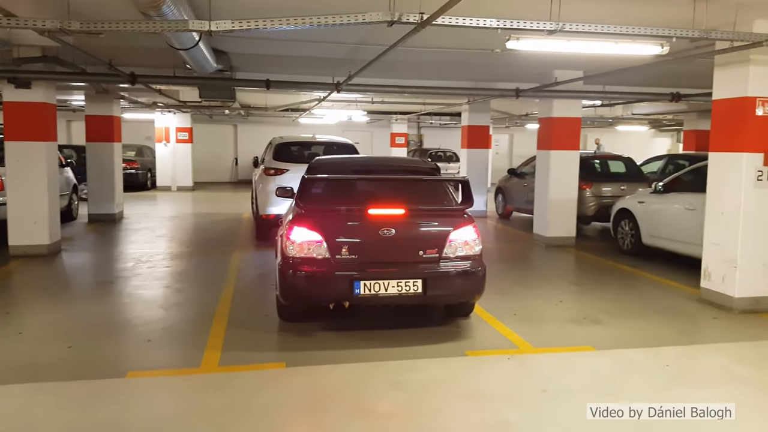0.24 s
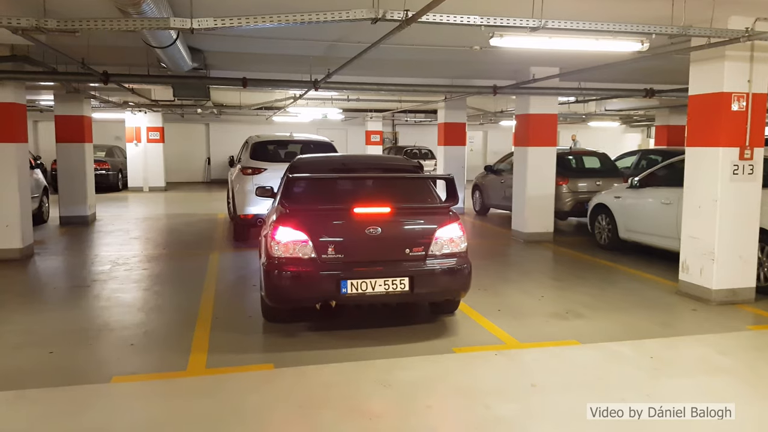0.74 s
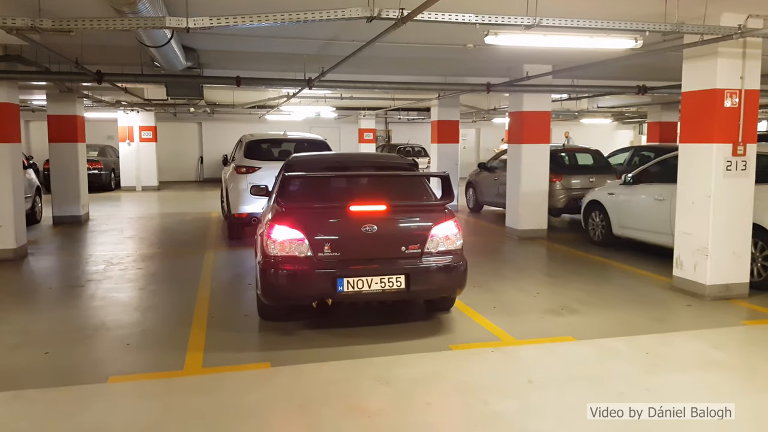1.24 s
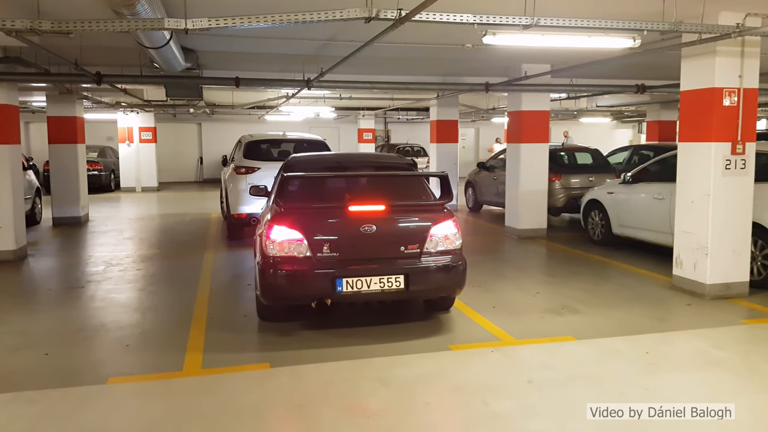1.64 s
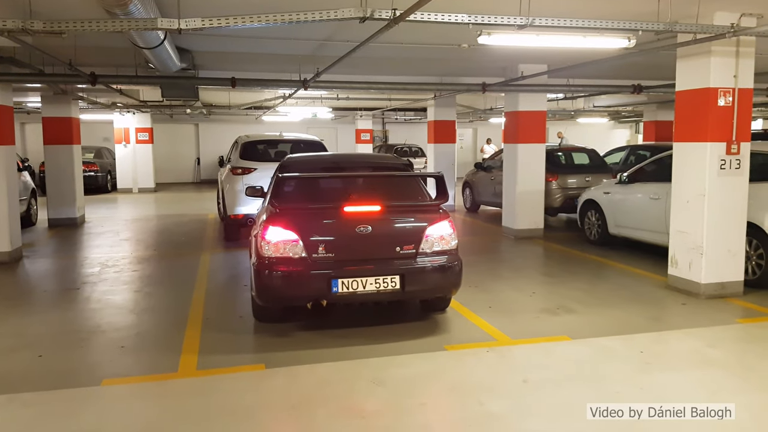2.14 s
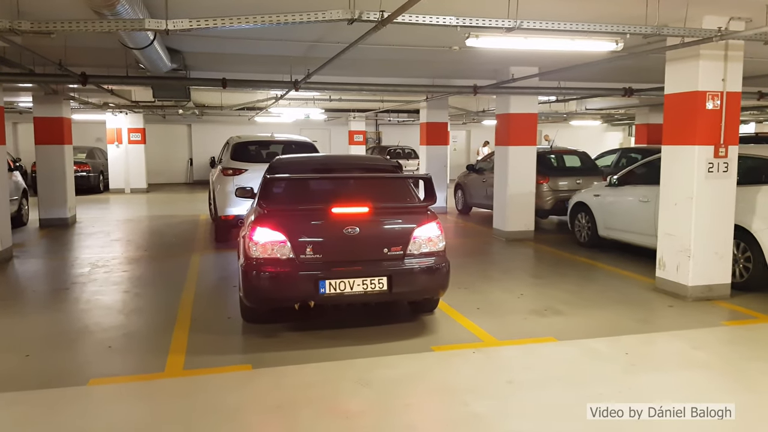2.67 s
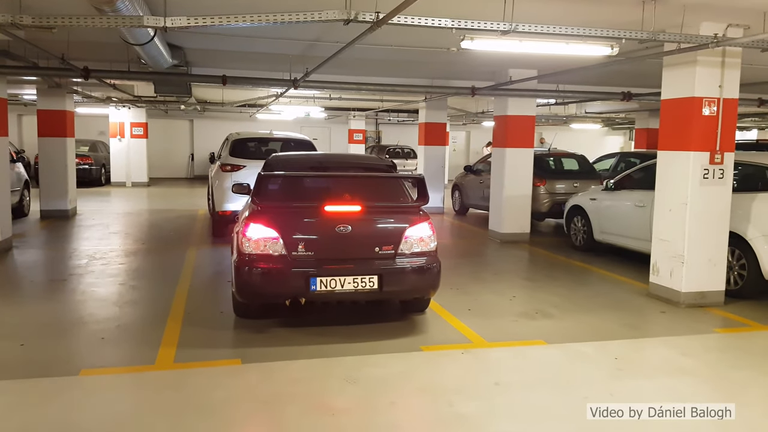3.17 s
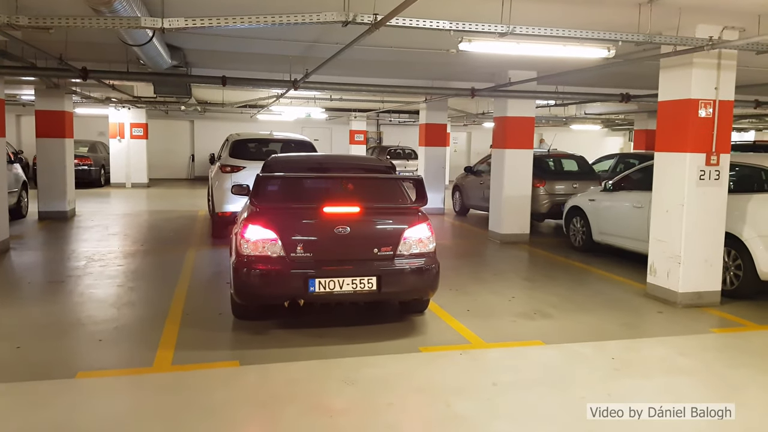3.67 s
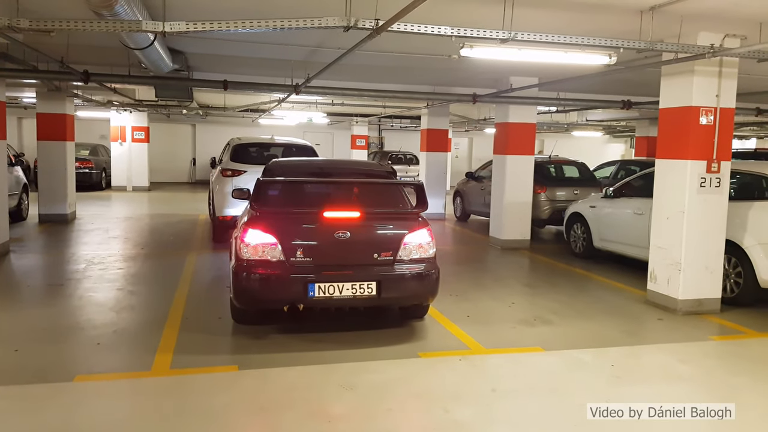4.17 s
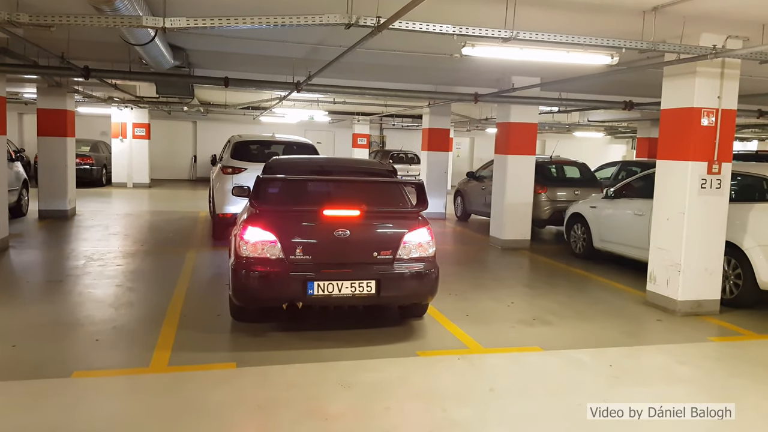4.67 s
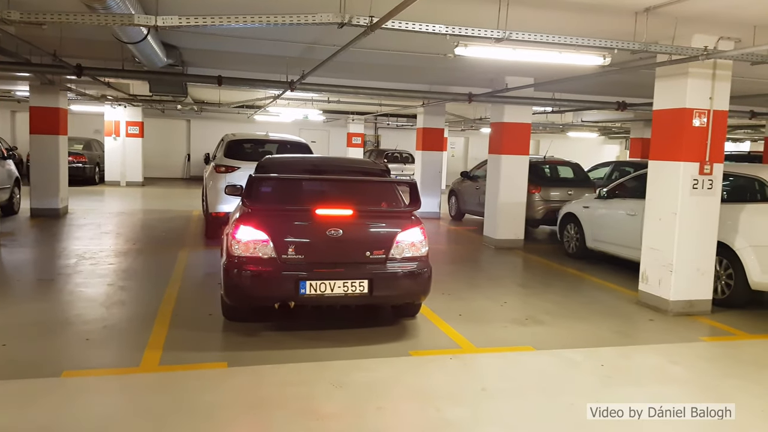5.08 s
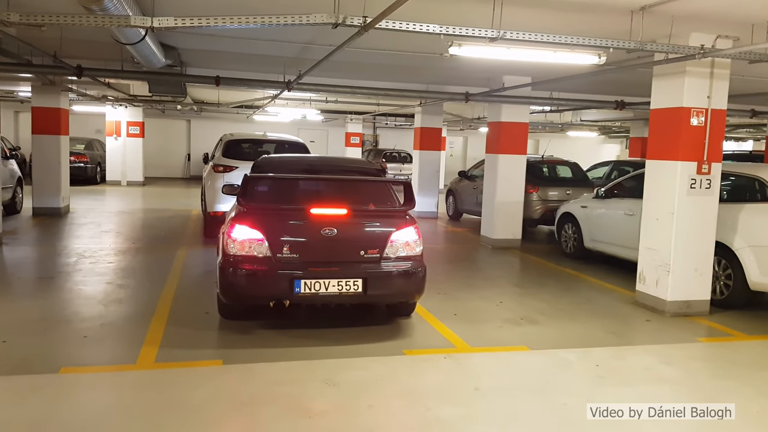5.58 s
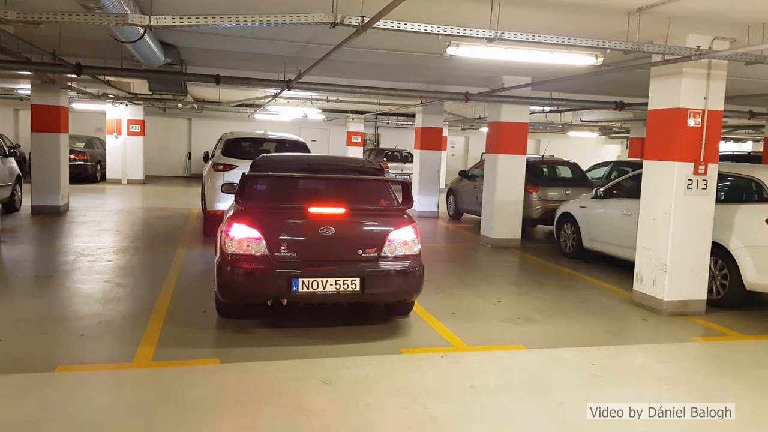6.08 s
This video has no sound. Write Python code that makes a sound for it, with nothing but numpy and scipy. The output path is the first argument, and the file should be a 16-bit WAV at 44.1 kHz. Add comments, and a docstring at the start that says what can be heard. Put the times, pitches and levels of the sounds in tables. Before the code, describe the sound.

A car idles with a deep, uneven, burbling exhaust in an echoing underground car park, its slightly fast idle sinking and settling under a steady mechanical whirr.

```python
"""Idling flat-four in an underground car park

A car is heard from behind; its fast idle sinks and settles. The cylinders fire in pairs, bank after bank,
into unequal headers: pulse trains with echoes, filtered by silencer and hall, make the exhaust burble.
Shaped noise and fading tones give the whirr and whine of the engine bay, diffused by the concrete.
Filtered impulses make a few tiny close ticks; decaying diffuse noise makes the clunks far off in the hall."""
import sys
import numpy as np
from scipy import signal
from scipy.fft import rfft, irfft, next_fast_len
from scipy.io import wavfile
from scipy.ndimage import uniform_filter1d, map_coordinates

SR = 44100
rng = np.random.default_rng(int(sys.argv[2]) if len(sys.argv) > 2 else 0)


def transcribe(u):
    """Save the signal u as a 16-bit wav file named by the first command-line argument.

    u: samples, shape (n,) or (channels, n), limited to [-1, 1]; the rate is SR.
    q: integer samples, one column per channel.
    """
    v = np.clip(np.atleast_2d(u).T, -1, 1)
    q = np.round(v * 32767).astype(np.int16)
    wavfile.write(sys.argv[1], SR, q)


N = 278435
LEAD = SR // 3  # samples of running engine before the scene opens

# Engine speed, a fast idle that sinks and then hunts gently: t/s, firing rate f/Hz
IDLE_SPEED = [(0.0, 33.77), (0.2, 32.408), (0.4, 31.732), (0.6, 31.088), (0.8, 30.769), (1.0, 29.699),
              (1.2, 29.237), (1.6, 28.075), (2.0, 28.513), (2.5, 28.959), (3.0, 28.679), (3.5, 28.26),
              (4.0, 27.754), (4.4, 27.284), (4.8, 26.604), (5.2, 26.678), (5.8, 27.255), (6.31, 27.276)]
# Cylinders in firing order: strength level/dB, timing offset/s, header echo delay/s, echo share/1
CYLINDERS = [(2.9258, -0.0046, 0.0171, -0.1195), (2.1473, -0.0039, 0.0147, -0.1358),
             (3.2288, -0.0054, 0.0051, 0.6793), (1.4045, -0.0055, 0.005, 0.6311)]
# Relative response of silencer and tailpipe, before the treble roll-off: f/Hz, level/dB
PIPE_RESPONSE = [(18.0, -75.6), (28.0, -35.1), (39.0, -16.1), (55.0, 1.4), (67.0, -4.8), (82.0, 14.6),
                 (104.0, -17.9), (120.0, -3.9), (137.0, 2.0), (160.0, -23.7), (172.0, -21.0),
                 (185.0, -39.1), (205.0, -24.5), (222.0, -21.2), (250.0, -21.5), (280.0, -16.6),
                 (330.0, -52.6), (900.0, -84.4)]
# Standing waves of the hall: f/Hz, width/Hz, share/1 (negative where it opposes the direct sound)
ROOM_MODES = [(64.3, 4.7, -1.45), (66.3, 2.3, 2.44), (78.4, 6.1, -1.18), (91.0, 4.9, -1.72),
              (101.8, 3.0, 7.38), (108.2, 1.9, -1.81), (117.9, 2.9, -1.86), (130.0, 4.5, -0.85),
              (136.8, 3.0, -0.86), (143.3, 1.8, -0.46), (148.0, 4.6, -1.4), (157.8, 1.8, 1.01),
              (164.3, 4.1, -2.06), (169.5, 1.8, -3.2), (201.4, 3.2, 1.69), (221.1, 1.8, 1.23),
              (229.3, 4.4, -1.78), (254.7, 3.8, -1.4), (277.2, 10.8, -1.58), (285.4, 1.8, 1.59)]
# Echoes from the far walls: delay/s, share/1
WALL_ECHOES = [(0.076, 0.3605), (0.0888, 0.0681), (0.1017, 0.1869), (0.1067, 0.126), (0.1532, 0.1595),
               (0.2272, 0.0484), (0.2292, 0.0812), (0.2711, 0.078), (0.2888, 0.0713), (0.3054, 0.0269)]
# Mean level of the exhaust's bass over a cycle: t/s, level/dB
BASS_LEVEL = [(0.0, -27), (0.4, -26), (0.9, -20.0), (1.2, -21.5), (2.4, -21.0), (3.2, -19), (4.05, -19.5),
              (4.7, -21.5), (5.2, -20), (5.9, -18.5), (6.31, -18.5)]
# Lope of the idle: t/s, swing of the bass over a cycle/dB, place of its crest/firings
LOPE = [(0.4, 0.5, 3.8), (1.0, 0.1, 3.7), (2.6, -0.1, 2.4), (4.1, 0.2, 2.1), (6.0, 1, 1.8)]
# Relative spectrum of gas leaving the tailpipe: f/Hz, level per Hz/dB
GAS_SPECTRUM = [(12, -29), (35, -11), (60, 11.5), (100, -7), (140, 11.5), (185, -10), (230, -6.5),
                (285, -1), (330, -17.5), (450, -16), (900, -40)]
# Relative spectrum of the exhaust pulses sent into the reverberation: f/Hz, level per Hz/dB
WASH_SPECTRUM = [(18, -28), (29, 0), (41, 13), (52, 0), (72, 1), (100, -12), (140, 0), (162, 0.5),
                 (187, -11), (222, -2.5), (250, -3), (285, -5), (310, -9.5), (380, -21.5), (450, -30),
                 (900, -58)]
# Reverberation time of the hall: f/Hz, time for a 60 dB decay/s
REVERB_TIME = [(60, 1.15), (300, 3.15), (2000, 1), (10000, .6)]
# Stereo spread of diffuse sound: f/Hz, side minus mid level/dB
DIFFUSE_WIDTH = [(60, -23), (125, -15), (250, -16), (500, -14.5), (1000, -3.5), (2000, 0)]
# Reference loudness of the running engine, to which layers add their offsets: t/s, level/dB
LOUDNESS = [(0.0, -45.5), (0.35, -47), (1.1, -41.5), (2.17, -42), (2.82, -40), (6.31, -41)]
WHIRR_DB, HISS_DB, PUFF_DB, WASH_DB, SPIT_DB = 0.6, -10.5, 1.5, 5.5, -3  # layer offsets from LOUDNESS
# Relative spectrum of the engine bay's whirr: f/Hz, level/dB
WHIRR_SPECTRUM = [(180, -72), (300, -0.5), (385, -2), (430, -6), (510, -0.5), (572, -2.5), (735, -2),
                  (775, -7.5), (975, -5.5), (1060, -7), (1300, -10), (1850, -10.5), (1980, -14.5),
                  (2350, -14.5), (2760, -18.5), (3280, -18), (4500, -38.5), (5850, -47), (9900, -120)]
# Relative spectrum of the engine bay's hiss: f/Hz, level/dB
HISS_SPECTRUM = [(2060, -40), (3500, 0), (4760, -6), (5400, -3.5), (6320, -7), (7670, -3), (8330, -8.5),
                 (15000, -16.5), (15700, -28)]
# Whine of pumps and pulleys, levels at mean loudness: f/Hz, level/dB, width/Hz
WHINES = [(380, -59, 5), (537.5, -56.5, 3.96), (729.6, -58.5, 7.2), (953, -56.5, 4.08), (1181, -60.5, 10),
          (1480, -65.5, 26), (2250, -62.5, 70), (2950, -65, 36), (5270, -73, 82), (7790, -68, 300)]
STEADY_HZ = 6.8  # tones narrower than this mostly hold their level; wider ones flicker
# Relative spectrum of the third cylinder's spit: f/Hz, level per Hz/dB
SPIT_SPECTRUM = [(150, -45), (300, 5), (600, -4), (1000, -10), (3000, -31), (8000, -60)]
SPIT_AT, SPIT_LENGTH = 1.985, 0.047  # place in the cycle and half length, in firings
# Pitches or hiss bands that swell out of the whirr: t/s, f/Hz, width/Hz, half length/s, level/dB
SWELLS = [(0.15, 291.5, 63, 0.18, -54), (0.61, 280, 1.2, 0.17, -41.5), (3.02, 8600, 1600, 0.11, -61),
          (3.557, 734, 8, 0.23, -48.5), (4.308, 1850, 59, 0.078, -51.5), (4.6, 537, 8, 0.67, -52.5),
          (4.803, 4390, 1400, 0.32, -56.5), (4.813, 684, 14, 0.11, -44), (2.5, 1500, 700, 0.81, -53.5),
          (5.897, 222.4, 3.3, 0.59, -47.5), (6.101, 380, 6, 0.57, -51)]
# Sharp little ticks, impulses before gain and colour: t/s, level/dB
TICKS = [(2.2229, -39), (2.4479, -28), (2.5037, -39)]
# Response that colours the ticks: f/Hz, level/dB
TICK_COLOUR = [(2000, -24), (6000, -8), (10000, -6), (13000, 3), (16000, -9)]
# Knocks far off in the hall: t/s, level before the envelope/dB, 60 dB decay/s, attack/s, tilt/dB per octave
CLUNKS = [(3.629, -38, 0.089, .004, 3), (5.698, -33.5, 0.9, 0.015, 0), (5.706, -41, 1, .008, 2.5),
          (5.815, -44, 0.89, 0.022, 1)]
# Relative spectrum of the knocks before each one's tilt: f/Hz, level/dB
CLUNK_COLOUR = [(150, -8), (350, 6), (470, 7), (640, 3), (760, -6), (1400, -8), (2000, -12), (2900, -9),
                (5000, -18), (7500, -27.5), (15000, -37)]
# Stereo balance: f/Hz, left minus right level/dB
BALANCE = [(60, 1.0), (110, 1), (200, 0), (380, 1), (700, 0.5), (1290, -1), (2380, 1.5), (4400, 2.5),
           (8120, 1.5), (15000, 2.5)]
TOP_HZ = 15800  # upper band limit


def amp(db):
    """Level definition: decibels become an amplitude ratio."""
    return 10 ** (np.asarray(db) / 20)


def unit(x):
    """Power normalisation: x is scaled to rms 1."""
    return x / np.sqrt(np.mean(x ** 2) + 1e-20)


def along(points, hz):
    """Logarithmic frequency scale: a response is interpolated between its (f, value) points."""
    f, value = np.transpose(points)
    return np.interp(np.log(hz + 1), np.log(f + 1), value)


def curves(rows):
    """Linear interpolation in time: each column after t/s gives one value per sample."""
    s, *columns = np.transpose(rows)
    return [np.interp(np.arange(N) / SR, s, column) for column in columns]


def wobble(rate):
    """Band-limited fluctuation: a spline passes through random knots, rate of them a second."""
    knots = rng.standard_normal(int(N * rate / SR) + 4)
    return map_coordinates(knots, [np.arange(N) * rate / SR])


def filtered(x, response):
    """Linear filtering: the spectrum of x is multiplied by a response of frequency."""
    n = x.shape[-1]
    padded = 2 * next_fast_len((n + SR) // 2)
    return irfft(rfft(x, padded) * response(np.fft.rfftfreq(padded, 1 / SR)), padded)[..., :n]


def causal(db):
    """Minimum phase: folding the cepstrum gives the causal response that has these gains."""
    cepstrum = irfft(np.log(amp(db)))
    half = len(cepstrum) // 2
    cepstrum[1:half] *= 2
    cepstrum[half + 1:] = 0
    return np.exp(rfft(cepstrum))


def diffuse(pair):
    """Diffuse-field coherence: two unrelated signals become alike in the bass, unrelated in the treble."""
    def mid_side_gain(hz):
        return np.array([np.ones_like(hz), amp(along(DIFFUSE_WIDTH, hz))])

    mid, side = filtered(pair, mid_side_gain)
    return unit(np.array([mid + side, mid - side]))


def rush(spectrum):
    """Turbulence as random noise: white noise is coloured and made diffuse, at rms 1."""
    noise = rng.standard_normal((2, N))
    return diffuse(filtered(noise, lambda hz: amp(along(spectrum, hz))))


def firings(count_up, scatter_db, jitter_s):
    """Pulse train with reflections: each firing is followed by its echo from the end of its header."""
    lead_in = count_up[0] + np.arange(-LEAD, 0) * IDLE_SPEED[0][1] / SR
    count_up = np.r_[lead_in, count_up]
    k = np.arange(int(count_up[0]), int(count_up[-1]) + 1)
    db, timing, delay, echo = np.array(CYLINDERS)[k % len(CYLINDERS)].T
    chance = rng.standard_normal((len(k), 2))
    s = np.interp(k, count_up, np.arange(LEAD + N) / SR) + timing + jitter_s * chance[:, 0]
    size = amp(db + scatter_db * chance[:, 1])
    at = np.maximum(np.r_[s, s + delay] * SR, 0).astype(int)
    return np.bincount(at, np.r_[size, size * echo], minlength=LEAD + N)[:LEAD + N]


def silencer(hz):
    """Acoustic filtering in a duct: resonances colour the pulses, the treble rolls off, the sign inverts."""
    rolloff_db = 20 * np.log10(1 + (hz / 1200) ** 2)
    return -causal(along(PIPE_RESPONSE, hz) - rolloff_db)


def walls(hz):
    """Modal superposition: modes and far echoes lift or swallow each harmonic as the speed drifts."""
    standing = sum(share * 1j * hz * width / (centre * centre - hz * hz + 1j * hz * width)
                   for centre, width, share in ROOM_MODES)
    echoes = sum(share * np.exp(-2j * np.pi * hz * delay) for delay, share in WALL_ECHOES)
    return 1 + standing + echoes


def hall(x):
    """Exponential decay: a one-second noise tail reverberates x, already built up at the start, at rms 1."""
    hz, t, z = signal.stft(rng.standard_normal((2, SR)), SR, nperseg=256)
    decay = amp(-60 * t / along(REVERB_TIME, hz)[:, None])
    tail = signal.istft(z * decay, SR, nperseg=256)[1]
    return diffuse(signal.fftconvolve(x[None], tail, axes=1)[:, LEAD:LEAD + N])


def exhaust(count_up, loud_db):
    """Pulsed source in a resonant space: pulses thud through the silencer, push out gas, set the hall booming."""
    bass_db, = curves(BASS_LEVEL)
    pulses = firings(count_up, scatter_db=.45, jitter_s=.00004)
    thud = unit(filtered(pulses, lambda hz: silencer(hz) * walls(hz))[LEAD:])
    # the gas surges with each firing, and harder while the second bank fires
    surge = 1.44 * np.cos(2 * np.pi * (count_up - .12))
    bank_surge = 0.77 * np.cos(2 * np.pi * (count_up - 2.7) / len(CYLINDERS))
    throb = surge + bank_surge
    puffs = unit(rush(GAS_SPECTRUM) * amp(0.83 * throb))
    # the pulses also reverberate in the hall, from the deep bass up
    reverberant = hall(filtered(pulses, lambda hz: amp(along(WASH_SPECTRUM, hz))))
    wash = unit(reverberant * amp(1.07 * throb))
    gas = amp(PUFF_DB) * puffs + amp(WASH_DB) * wash
    # the idle lopes: the bass swells and sinks once a cycle
    swing_db, crest = curves(LOPE)
    lope_db = swing_db * np.cos(2 * np.pi * (count_up - crest) / len(CYLINDERS))
    return amp(bass_db + lope_db) * thud + amp(loud_db) * gas


def patchy(x, depth_db):
    """Independent band modulation: neighbouring regions of the spectrum swell and fade on their own."""
    z = signal.stft(x, nperseg=1024)[2]
    field = rng.standard_normal(z.shape[1:])
    field = uniform_filter1d(field, size=3, axis=0)  # across frequency
    field = uniform_filter1d(field, size=16, axis=1)  # along time
    return signal.istft(z * amp(depth_db * unit(field)), nperseg=1024)[1][:, :N]


def narrow(hz, width_hz):
    """Interference: reflections fade differently at either side around a steady tone; the sum has rms 1."""
    fading = np.array([wobble(width_hz) + 1j * wobble(width_hz) for _ in range(2)])
    carrier = np.exp(2j * np.pi * hz * np.arange(N) / SR)
    return unit(np.real((STEADY_HZ / width_hz + fading) * carrier))


def engine_bay(count_up, loud_db):
    """Amplitude modulation: belts and fans whirr and whine; the valve gear clatters in step with firings."""
    clatter = amp(.5 * np.cos(4 * np.pi * count_up))  # twice per firing
    flutter = amp(0.18 * np.cos(2 * np.pi * (count_up - .2)))
    whirr = unit(patchy(rush(WHIRR_SPECTRUM), depth_db=1.46) * clatter * flutter)
    whirr = amp(WHIRR_DB + 0.52 * wobble(12)) * whirr
    hiss = unit(patchy(rush(HISS_SPECTRUM), depth_db=2.0) * clatter)
    hiss = amp(HISS_DB + 0.35 * wobble(20)) * hiss
    whine = sum(amp(db) * narrow(hz, width_hz) for hz, db, width_hz in WHINES)
    return amp(loud_db) * (whirr + hiss) + amp(loud_db - np.mean(loud_db)) * whine


def spit(count_up, loud_db):
    """Gated turbulence: once a cycle, as the second bank takes over, the tailpipe spits a burst of gas."""
    cycle = len(CYLINDERS)
    away = (count_up - SPIT_AT + cycle / 2) % cycle - cycle / 2
    burst = np.exp(-(away / SPIT_LENGTH) ** 2)
    return amp(loud_db + SPIT_DB) * burst * rush(SPIT_SPECTRUM)


def swells():
    """Gaussian envelope: now and then one band swells out of the whirr and fades again."""
    t, out = np.arange(N) / SR, np.zeros((2, N))
    for s, hz, width_hz, half_s, db in SWELLS:
        shape = np.exp(-((t - s) / half_s) ** 2)
        shape_rms = np.sqrt(np.mean(shape ** 2))
        out += amp(db) * shape_rms * unit(shape * narrow(hz, width_hz))
    return out


def ticks(gain_db):
    """Impulse response: dry, very short ticks sound close by, equally on both sides."""
    out = np.zeros(N)
    for s, db in TICKS:
        out[round(s * SR)] = amp(db + gain_db)
    return filtered(out, lambda hz: causal(along(TICK_COLOUR, hz)))


def clunks():
    """Reverberant decay: far knocks arrive as diffuse noise that dies away, some duller than others."""
    out = np.zeros((2, N))
    for s, db, t60, attack_s, tilt_db in CLUNKS:
        age = np.maximum(np.arange(N) / SR - s, 0)
        colour = [(hz, level + tilt_db * np.log2(hz)) for hz, level in CLUNK_COLOUR]
        decay = np.exp(-np.log(1000) * age / t60)
        attack = 1 - np.exp(-age / attack_s)
        out += rush(colour) * amp(db) * decay * attack
    return out


def scene():
    """Superposition: one crankshaft drives exhaust and engine bay, and all sources add."""
    firing_hz, = curves(IDLE_SPEED)
    loud_db, = curves(LOUDNESS)
    count_up = np.cumsum(firing_hz) / SR - .77  # crankshaft phase, in firings
    car = exhaust(count_up, loud_db) + engine_bay(count_up, loud_db) + spit(count_up, loud_db) + swells()
    mix = car + ticks(gain_db=13.0) + clunks()
    # half of the level difference goes to each side
    return filtered(mix, lambda hz: amp(np.outer([.5, -.5], along(BALANCE, hz))))


def record(dry):
    """Band limitation: nothing passes above the upper limit."""
    return filtered(dry, lambda hz: hz < TOP_HZ)


dry = scene()
out = record(dry)
transcribe(out)
```